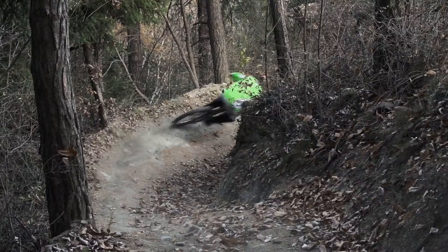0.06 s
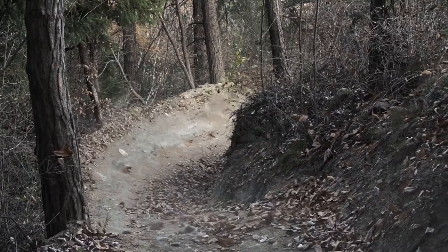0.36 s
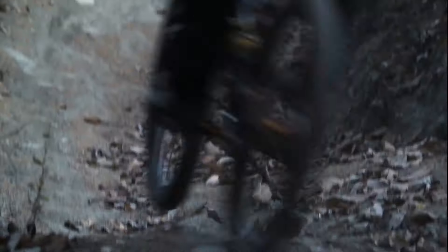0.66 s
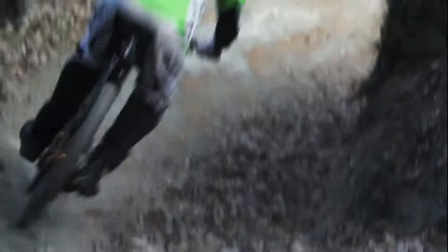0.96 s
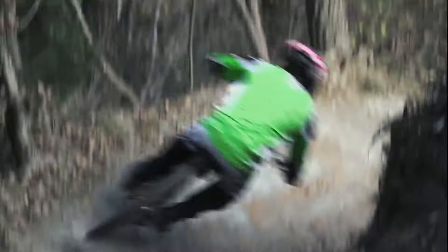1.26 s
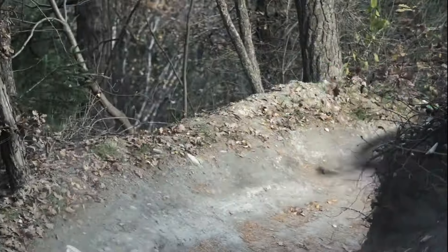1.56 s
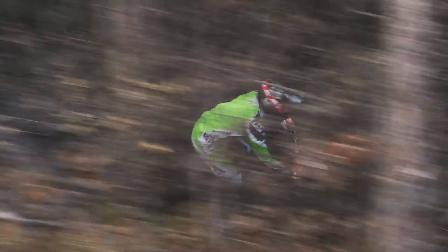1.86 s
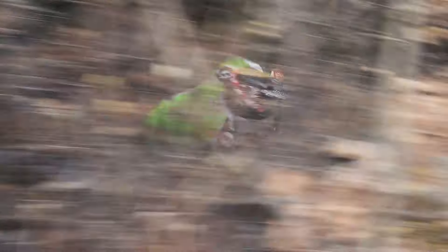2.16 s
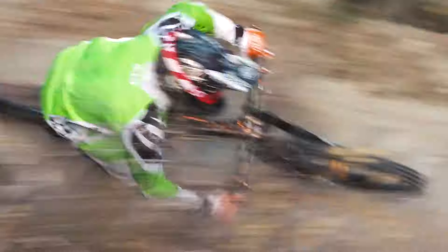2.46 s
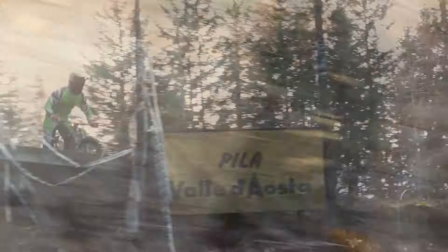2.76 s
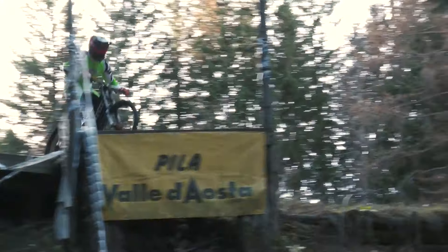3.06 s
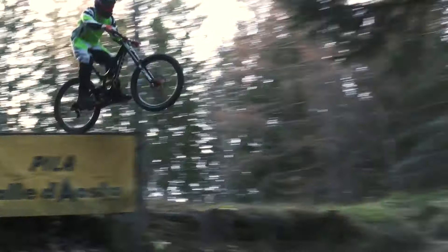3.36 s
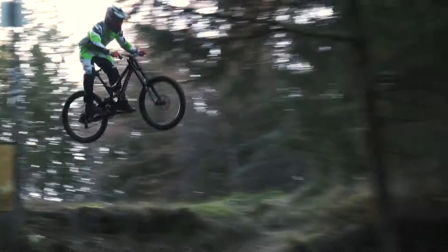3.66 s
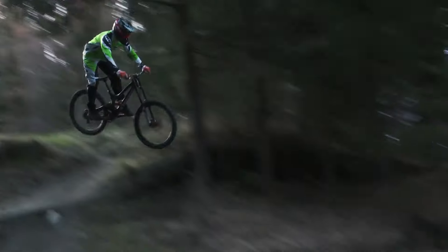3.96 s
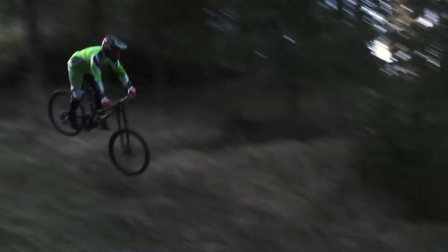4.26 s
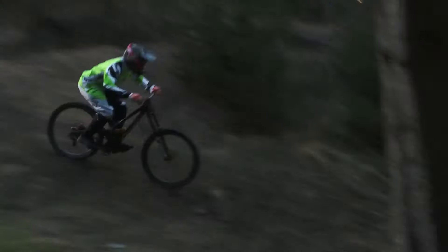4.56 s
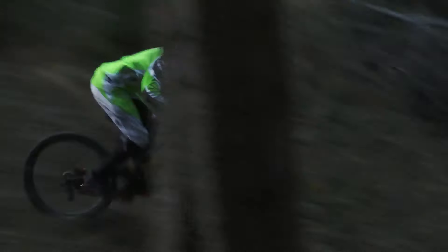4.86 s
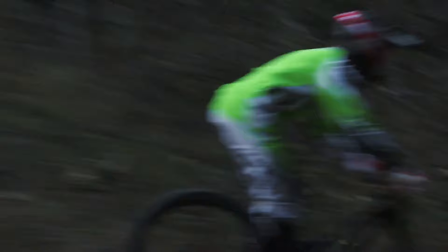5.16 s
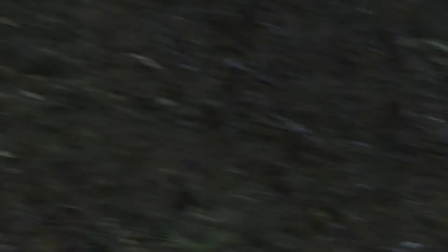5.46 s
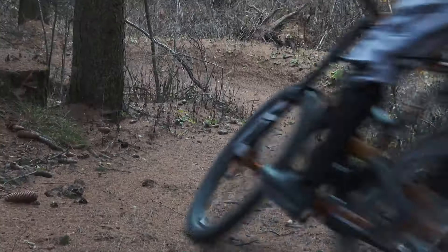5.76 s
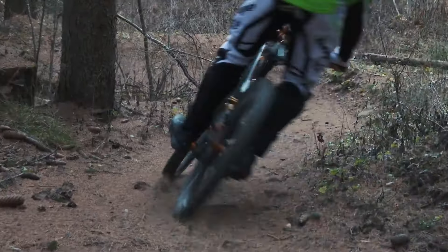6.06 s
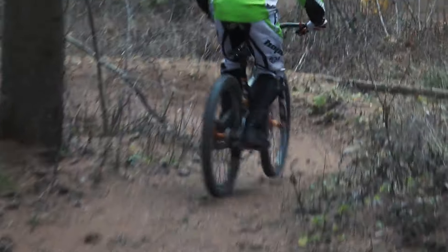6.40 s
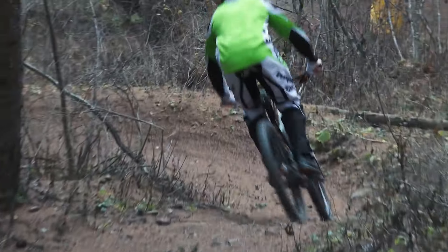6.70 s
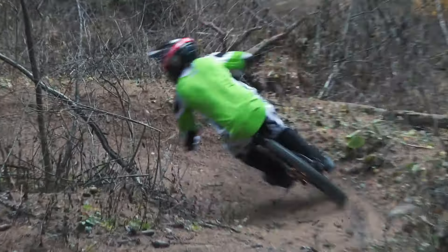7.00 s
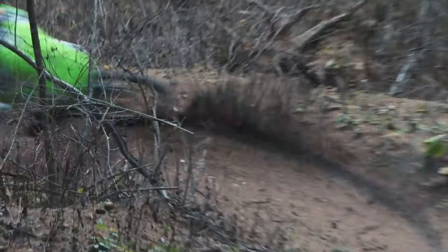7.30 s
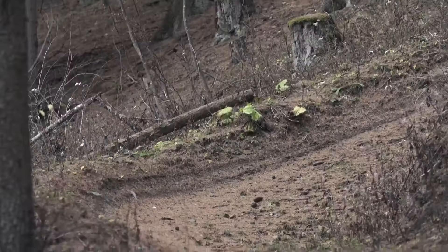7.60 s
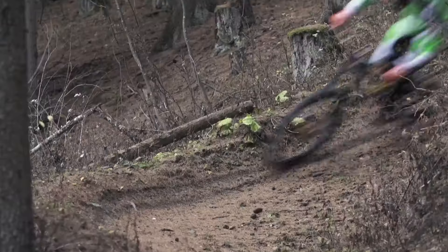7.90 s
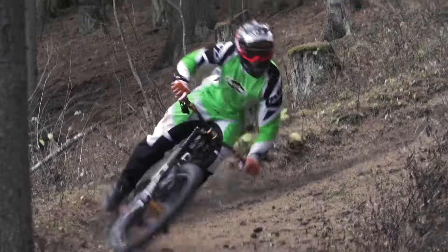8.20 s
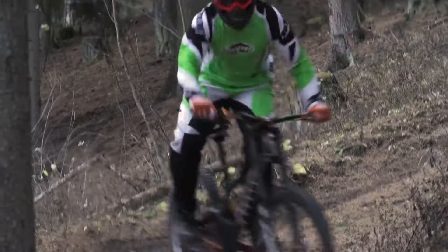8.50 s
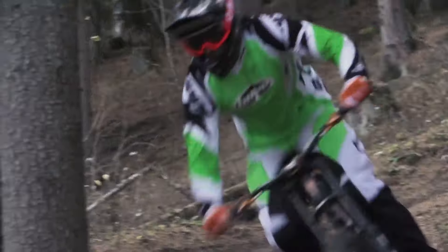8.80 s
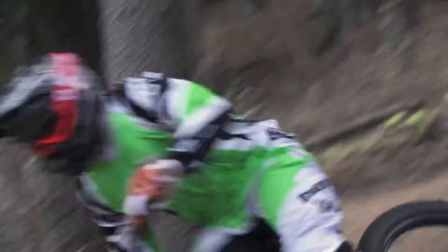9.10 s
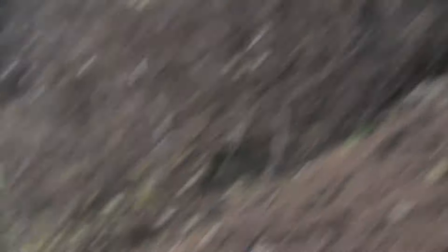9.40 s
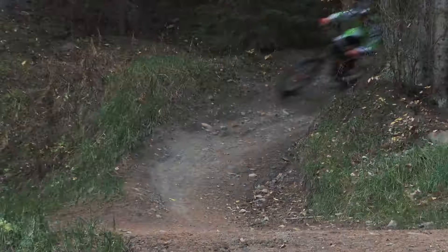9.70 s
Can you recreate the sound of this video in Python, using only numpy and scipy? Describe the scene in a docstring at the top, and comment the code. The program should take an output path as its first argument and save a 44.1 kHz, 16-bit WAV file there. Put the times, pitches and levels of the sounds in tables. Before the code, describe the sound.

Mountain bikes race down a forest dirt trail, tyres scrubbing through dirt and dry leaves, frames rattling and freehubs buzzing.

```python
"""Mountain bikes race down a forest dirt trail. From the start, knobbly tyres roar and scrub through
berms and throw dirt into dry leaves, while bumps set frame and chain clattering. Thin, very high chirps
sound among the trees; gravel skids and gusts of air rumble. About three seconds in, a bike takes a jump:
the pawls of its freehub tick ever more slowly in the air, and it lands with a hollow boom. Riders then
pass close, their freehubs buzzing whenever they coast, over the faint hush of the forest."""
import sys
import numpy as np
from scipy import signal
from scipy.fft import rfft, irfft, next_fast_len
from scipy.io import wavfile
from scipy.ndimage import uniform_filter1d, map_coordinates

SR = 44100
rng = np.random.default_rng(int(sys.argv[2]) if len(sys.argv) > 2 else 0)


def write(x):
    x = np.atleast_2d(x).T
    wavfile.write(sys.argv[1], SR, np.round(np.clip(x, -1, 1) * 32767).astype(np.int16))


N = 434385


def amp(db):
    """Decibels to amplitude ratio."""
    return 10 ** (np.asarray(db) / 20)


def unit(x):
    """Normalisation to rms 1."""
    return x / np.sqrt(np.mean(x ** 2) + 1e-20)


def along(points, hz):
    """Interpolation of (Hz, value) points on a logarithmic frequency axis."""
    f, values = np.transpose(points)
    return np.interp(np.log(hz + 1), np.log(f + 1), values)


def curves(rows):
    """Linear interpolation in time: one value per sample for each column after the first."""
    times, *columns = np.transpose(rows)
    return [np.interp(np.arange(N) / SR, times, column) for column in columns]


def wobble(rate):
    """Random modulation: straight lines through rate Gaussian knots a second."""
    knots = rng.standard_normal(4096)
    return np.interp(np.arange(N) * rate / SR, np.arange(len(knots)), knots)


def swell(s, rise, hold, fall):
    """Exponential envelope: up 20 dB per rise seconds until s, held, then down 20 dB per fall seconds."""
    t = np.arange(N) / SR - s
    return amp(-20 * np.minimum(np.maximum(-t, 0) / rise + np.maximum(t - hold, 0) / fall, 10))


def filtered(x, response):
    """Linear filtering: the spectrum of x times a complex frequency response."""
    n = x.shape[-1]
    size = next_fast_len(n + 4096)
    return irfft(rfft(x, size) * response(np.fft.rfftfreq(size, 1 / SR)), size)[..., :n]


def low_passed(x, cutoff_hz, order=4):
    """Zero-phase attenuation above a cutoff."""
    return filtered(x, lambda hz: 1 / (1 + (hz / cutoff_hz) ** order))


def coloured(x, spectrum):
    """Spectral shaping by (Hz, dB) points, at rms 1."""
    return unit(filtered(x, lambda hz: amp(along(spectrum, hz))))


def ring(x, modes, scale=1):
    """Modal resonance: x drives (centre, bandwidth, dB) modes, shifted and widened by scale."""
    def response(f):
        total = 0
        for k, (centre, width, db) in enumerate(modes):
            damping = 1j * f * width * scale
            total += (-1) ** k * amp(db) * damping / ((centre * scale) ** 2 - f * f + damping)
        return total
    return filtered(x, response)


def add(track, s, sound):
    """Superposition of a sound on a track at s seconds."""
    start = int(np.clip(round(s * SR), 0, N - 1))
    track[start:start + len(sound)] += sound[:N - start]


def crunch(rate, spread_db, share):
    """Shot noise: rate impacts a second carry a share of the power, countless small ones the rest."""
    struck = rng.random(N) < rate / SR
    sizes = amp(spread_db * np.clip(rng.standard_normal(N), -2, 2))
    grains = unit(struck * sizes * rng.choice([-1, 1], N))
    return np.sqrt(share) * grains + np.sqrt(1 - share) * rng.standard_normal(N)


def trail_levels(blend_s=0.07):
    """Incoherent sounds add in power: the running levels in dB of roar, scrub, grit, leaves and wind."""
    # Steady stretches of trail. Each row: start in seconds, then roar, scrub, grit, leaves, wind in dB.
    stretches = [(0, -48, -55, -41.5, -47, -70), (0.47, -44.5, -44.5, -43.5, -43.5, -78),
                 (1.8, -46.5, -53.5, -46.5, -49, -40.5), (2.93, -57, -64.5, -70, -67, -47),
                 (3.42, -68, -63.5, -63, -70, -57.5), (4.39, -63, -72, -54, -44, -49.5),
                 (5.4, -50.5, -56.5, -58, -47.5, -43), (7.48, -60, -56, -55.5, -52, -45),
                 (8.4, -52, -53, -50.5, -49.5, -42)]
    # Tyres bite into berms, ramps and landings.
    # Each row: peak time, rise and fall in seconds, then roar, scrub and grit in dB.
    carves = [(0.02, 0.23, 0.51, -42.5, -34, -35.5), (0.45, 0.22, 0.51, -37, -38, -42),
              (0.74, 0.21, 0.16, -33, -32, -34.5), (1.19, 0.34, 0.49, -41, -34, -40),
              (1.46, 0.31, 0.59, -35, -33.5, -34.5), (2.0, 0.13, 1, -51, -54, -41.5),
              (2.62, 1, 0.3, -54, -55, -44.5), (3.17, 0.11, 0.37, -41, -52, -52.5),
              (3.3, 0.23, 0.21, -46.5, -52, -49.5), (4.45, 0.082, 0.42, -36.5, -42, -37),
              (5.248, 0.21, 0.21, -25.5, -24.5, -30), (5.63, 0.37, 0.29, -33, -34, -32.5),
              (5.98, 0.36, 0.49, -38.5, -42.5, -41), (7.09, 0.24, .25, -40, -44, -53),
              (7.265, 0.32, 0.17, -34, -40, -43), (7.35, 0.2, 0.12, -35, -48, -46),
              (8.15, 0.4, 0.27, -41, -39.5, -44.5), (8.275, 0.4, 0.22, -37, -33.5, -39.5),
              (9.02, 0.22, 0.28, -38, -35.5, -33.5), (9.278, 0.12, .14, -32, -33, -32),
              (9.5, 0.25, 0.33, -35, -37, -37.5)]
    # Dirt thrown into leaves. Each row: start, hold and fall in seconds, level in dB.
    sprays = [(0.482, 0.43, 0.6, -36.5), (1.498, 0.26, 0.13, -39.5), (2.438, 0.29, 0.29, -44),
              (4.401, 0.22, 0.065, -41), (5.182, 0.6, 0.16, -45.5), (5.959, 0.11, 1, -38),
              (7.3, 0.16, .5, -58), (8.076, 0.087, 0.47, -46.5), (9.27, 0.054, 0.2, -31),
              (9.677, .06, 0.11, -45)]
    # Gusts of air. Each row: peak time in seconds, level in dB.
    gusts = [(1.819, -43), (1.899, -36), (2.08, -34.5), (2.25, -37), (2.48, -35), (2.8, -41), (4.44, -33.5),
             (5.28, -32.5), (5.55, -35), (5.87, -31), (7.24, -38), (7.66, -35.5), (7.76, -30), (8.05, -39),
             (8.35, -36), (9.0, -40), (9.28, -32)]
    starts, *levels_db = np.transpose(stretches)
    stretch = np.searchsorted(starts[1:], np.arange(N) / SR)
    steady_db = uniform_filter1d(np.array(levels_db)[:, stretch], int(blend_s * SR), axis=1)
    power = amp(steady_db) ** 2
    for s, rise, fall, *tyre_db in carves:
        power[:3] += amp(tyre_db)[:, None] ** 2 * swell(s, rise, 0, fall) ** 2
    for s, hold, fall, db in sprays:
        power[3] += (amp(db) * swell(s, rise=0.04, hold=hold, fall=fall)) ** 2
    for s, db in gusts:
        power[4] += (amp(db) * swell(s, rise=0.06, hold=0, fall=0.3)) ** 2
    return 10 * np.log10(power)


def tyres(roar_db, scrub_db, grit_db):
    """Rolling noise: knobs drum on the casing and tear at the soil, modulated by the fluttering load."""
    # Spectra of casing, soil and grit. Each row: frequency in Hz, relative density in dB.
    roar_spectrum = [(50, -24), (100, -3.5), (160, -1), (260, 2.5), (400, -8.5), (520, -21), (900, -65)]
    scrub_spectrum = [(250, -26.5), (400, 0.5), (500, 1), (680, -0.5), (950, -6.5), (1200, -22),
                      (2200, -57)]
    grit_spectrum = [(600, -14), (1000, 1.5), (1300, 3.5), (2000, 1.5), (2900, -2), (4200, -7.5),
                     (6500, -16.5), (12000, -36)]
    load = wobble(45)
    roar = amp(roar_db + 1.3 * load) * coloured(crunch(500, spread_db=4, share=0.8), roar_spectrum)
    scrub = amp(scrub_db + 0.49 * load) * coloured(crunch(600, spread_db=4.5, share=0.54), scrub_spectrum)
    grit_gain = amp(grit_db + 0.53 * load + 1.76 * wobble(130))
    grit = grit_gain * coloured(crunch(900, spread_db=4.5, share=0.45), grit_spectrum)
    return roar + scrub + grit


def spray(level_db):
    """Granular impact noise: thrown dirt patters on dry leaves in small clumps."""
    # Spectrum of struck leaves. Each row: frequency in Hz, relative density in dB.
    leaves = [(1500, -4.5), (3000, 5), (4500, 3), (6300, 3), (9000, 1), (12000, -1), (15800, -5)]
    return amp(level_db + 2.4 * wobble(110)) * coloured(crunch(1200, spread_db=5, share=0.39), leaves)


def stones(grit_db, count=260, lowest_hz=1100, octaves=0.97, t60_s=0.0099):
    """Heavily damped resonance: stones crack together under the tyres, each a brief, rough knock."""
    track = np.zeros(N)
    t = np.arange(SR // 60) / SR
    for when, pitch, size in rng.random((count, 3)):
        at = int(when * N)
        hz = lowest_hz * 2 ** (octaves * pitch)
        contact = rng.standard_normal(len(t)) * amp(-60 * t / t60_s)
        knock = ring(contact, [(hz, hz / 2, 0)])
        add(track, at / SR, amp(grit_db[at] + 14.5) * size ** 2 * knock / np.abs(knock).max())
    return track


def bump(length_s, thud_db, knock_db, clack_db, clank_hz, clank_db, contacts_per_s=1900):
    """Impact excitation: a cluster of contacts rings the modes of tyre, frame, chain and a metal part."""
    # Modes of the bike. Each row: nominal frequency and bandwidth in Hz, relative level in dB.
    casing = [(154, 41, -4.5), (257.6, 52, 3), (366, 110, 0.5)]
    frame = [(467, 103, 1.1), (745, 170, 1.5), (994, 240, -3), (1400, 290, -5.5)]
    chain = [(1720, 430, 1.5), (2400, 300, 4.5), (2840, 260, 3.5), (3560, 320, 1.5), (4340, 620, -5.5),
             (6000, 1400, -10.5)]
    # Modes of the metal part. Each row: frequency and bandwidth as multiples of its pitch, level in dB.
    clank = [(1, 0.082, 1), (1.26, .09, -6.5), (1.63, 0.12, -10.5)]
    t = np.arange(SR // 9) / SR
    # The shaking builds as the wheel meets the bump, eases across it, then dies away.
    rise = 1 - np.exp(-t / (0.2 * length_s))
    t60_s = 0.0085 + 4.4 * length_s
    fall = amp(-7 * np.minimum(t / length_s, 1) - 60 * np.maximum(t - length_s, 0) / t60_s)
    contacts = (rng.random(len(t)) < contacts_per_s / SR) + 0.13
    detune = np.exp(0.05 * rng.standard_normal(3))
    heaviness = length_s / 0.0083  # longer, heavier blows ring casing and chain lower
    parts = [(casing, thud_db, detune[0] * heaviness ** -0.088),
             (frame, knock_db, detune[1]),
             (chain, clack_db, detune[2] * heaviness ** -0.065),
             (clank, clank_db, clank_hz)]
    sound = np.zeros(len(t))
    for modes, db, scale in parts:
        part = ring(rise * fall * contacts * rng.standard_normal(len(t)), modes, scale)
        sound += amp(db) * part * np.sqrt(length_s * SR / np.sum(part ** 2))
    return sound


def hard_bumps():
    """Shock excitation: roots and rocks shake the whole bike."""
    # Each row: start and length in seconds, tyre thud, frame knock and chain clack in dB,
    # pitch of the struck metal part in Hz, its level in dB.
    blows = [(0.025, 0.0065, -28.5, -28, -28, 2620, -35), (0.098, 0.028, -32, -36, -27.5, 2000, -34.5),
             (0.156, 0.013, -35, -33.5, -31.5, 2490, -34), (0.199, 0.0084, -40, -36, -33, 2330, -26.5),
             (0.207, .009, -32, -35, -29, 1720, -23), (0.229, 0.0071, -30, -30, -34, 1310, -25),
             (0.236, 0.015, -29.5, -24.5, -25.5, 1770, -27), (0.254, 0.009, -29, -31, -39, 1400, -33),
             (0.312, 0.0067, -36, -31.5, -33, 1490, -26), (0.39, .004, -35, -44, -42, 1500, -37),
             (0.411, .005, -46, -39, -42, 1360, -32), (0.616, 0.0058, -28, -15.5, -24.5, 1450, -23.5),
             (0.635, 0.005, -23.5, -26, -42, 980, -41), (0.69, 0.0095, -38, -31, -39, 1900, -36),
             (0.775, 0.0081, -44, -34, -36, 1360, -31.5), (0.798, 0.0031, -21, -21.5, -37, 1010, -33),
             (0.861, 0.002, -26, -19.5, -30, 1850, -29), (1.114, 0.029, -31.5, -23, -27.5, 1040, -27),
             (1.324, 0.0056, -34, -23, -49, 1230, -40), (1.421, 0.009, -23.5, -21, -29, 1668, -31),
             (1.483, .01, -36, -33, -33, 3000, -29), (1.567, 0.014, -31, -31, -32, 2100, -34.5),
             (1.647, 0.019, -31.5, -39, -35.5, 1900, -34), (1.684, 0.0036, -39, -41.5, -28.5, 2820, -31),
             (1.937, 0.033, -46, -40.5, -36, 1710, -36), (2.061, 0.01, -50, -44, -52, 1600, -44),
             (2.228, .006, -39, -42, -43, 1600, -43), (2.344, 0.0087, -48, -45, -45, 1950, -34.5),
             (2.521, 0.0058, -54, -48, -44, 1800, -36), (2.583, 0.0074, -56, -38.5, -38, 1650, -40),
             (3.139, 0.011, -48, -44, -50, 2100, -52), (3.321, 0.007, -52, -47, -55, 760, -42),
             (3.35, 0.012, -54, -48, -51, 755, -46), (4.398, 0.011, -39, -41, -32.5, 2400, -35),
             (4.433, 0.0037, -38, -46, -31, 3000, -36), (4.448, 0.021, -31.5, -38, -38, 1340, -34),
             (4.991, .009, -27, -37, -40, 1400, -48), (5.112, 0.0085, -34, -39, -34.5, 3000, -32),
             (5.138, 0.0043, -22.5, -25, -42, 1390, -46), (5.178, 0.019, -27, -24, -37, 1400, -40),
             (5.213, 0.0012, -40, -34, -28, 5600, -27.5), (5.229, 0.0094, -24, -22, -30, 1420, -31),
             (5.303, 0.023, -20, -22.5, -32, 1100, -32.5), (5.313, 0.0018, -32, -29, -33, 6900, -25.5),
             (5.401, 0.0052, -27.5, -28, -36, 1100, -34), (5.553, 0.0036, -25.5, -28, -39, 3960, -36),
             (5.71, 0.02, -38, -25.5, -29.5, 1370, -27.5), (5.721, 0.0029, -35, -27, -26, 4760, -20),
             (5.834, 0.0086, -28.5, -26.5, -29.5, 1184, -32), (6.312, .004, -46, -40, -44, 1697, -46),
             (6.634, 0.0053, -53, -41, -46, 1400, -45), (7.314, 0.0048, -40, -48, -39, 3420, -44),
             (7.422, 0.0043, -51, -68, -36.5, 2250, -40), (8.075, 0.0035, -41, -33.5, -44, 1894, -35.5),
             (8.174, 0.009, -42, -31, -34.5, 1000, -32), (8.552, 0.01, -51, -36.5, -43, 1090, -44),
             (8.626, 0.0072, -45, -38, -42, 1500, -41), (8.727, 0.0062, -52, -34.5, -41, 1300, -43),
             (8.813, 0.014, -33.5, -39.5, -40, 1300, -40), (8.8688, 0.0024, -36, -23, -27, 1600, -21),
             (8.872, 0.018, -31.5, -22.5, -24.5, 1250, -26.5), (8.902, 0.017, -38, -32, -31, 1510, -31),
             (8.939, 0.026, -32, -27, -29, 1200, -32.5), (9.1277, 0.0019, -46, -29, -20.5, 2050, -21),
             (9.25, 0.0022, -43, -39, -23.5, 3010, -25), (9.389, 0.016, -46, -34, -33, 1610, -33),
             (9.425, .011, -20, -25, -25, 2000, -27.5), (9.52, 0.0024, -29, -26, -19.5, 2445, -17.5),
             (9.553, 0.019, -34, -30.5, -35.5, 1490, -44), (9.633, 0.011, -28.5, -30, -34, 1830, -35),
             (9.699, 0.006, -45, -35, -27.5, 2560, -24.5), (9.718, 0.01, -41, -36, -34, 1850, -33.5),
             (9.772, 0.0033, -44, -39, -34, 2670, -31)]
    track = np.zeros(N)
    for s, *blow in blows:
        add(track, s, bump(*blow))
    return track


def rattles(roar_db, scrub_db, grit_db, count=50):
    """Random excitation: small bumps shake the bike, more strongly where the tyres work harder."""
    track = np.zeros(N)
    for k in range(count):
        at = int((k + rng.random()) * N / count)
        chance_db = rng.uniform(-1.3, 1)
        clank_hz = 1690 * 2 ** rng.uniform(-0.43, 0.5)
        rattle = bump(length_s=0.0066, thud_db=roar_db[at] - 1, knock_db=scrub_db[at] - 3,
                      clack_db=grit_db[at] - 0.5, clank_hz=clank_hz, clank_db=grit_db[at] + 2)
        add(track, at / SR, amp(chance_db) * rattle)
    return track


def hush(level_db=-54.5, width=0.94):
    """Ambient noise: a faint, steady forest hush with a little stereo width."""
    # Each row: frequency in Hz, relative density in dB.
    spectrum = [(50, -8), (100, -6), (145, 4), (260, -2.5), (440, -4), (600, -5.5), (720, -3), (950, -11.5),
                (1500, -13), (3000, -20.5), (6000, -24), (15000, -36)]
    apart = low_passed(rng.standard_normal((2, N)), 900)
    return amp(level_db) * coloured(rng.standard_normal(N) + width * apart, spectrum)


def hum(level_db=-62.5):
    """Narrow-band noise is heard as pitch: something far off hums faintly."""
    # Each row: frequency and bandwidth in Hz, relative level in dB.
    bands = [(595, 30, -0.5), (658, 18, -1)]
    return amp(level_db) * unit(ring(rng.standard_normal(N), bands))


def chirps(trill_gap_s=0.0425, trill_fade_db=1.8, note_s=0.0133):
    """Frequency modulation: short whistles dip and lift, and trunks scatter each into a fluttering tail."""
    # Single chirps and trills. Each row: start in seconds, pitch in Hz, level in dB, number of notes.
    calls = [(0.594, 11730, -16, 1), (1.826, 12100, -37, 1), (1.871, 12080, -23.5, 1),
             (1.969, 13000, -34, 1), (2.179, 13100, -36, 1), (3.728, 10860, -40.5, 1),
             (5.335, 13000, -46, 1), (5.399, 12500, -30, 1), (5.445, 11280, -22, 1),
             (5.506, 12740, -19.5, 1), (5.565, 12600, -17, 1), (5.749, 12700, -11.5, 1),
             (5.811, 10840, -11.5, 1), (7.035, 10950, -41, 1), (7.225, 10950, -44, 3),
             (7.29, 10780, -36, 1), (7.659, 11250, -42.5, 1), (7.753, 12400, -39, 1),
             (7.899, 11170, -37.5, 2), (8.06, 11400, -41, 1), (8.095, 12700, -36, 2), (8.42, 12400, -36, 1),
             (8.403, 11280, -31, 2), (8.54, 12370, -19, 1), (8.565, 13300, -12.5, 2),
             (8.657, 13360, -12, 5), (8.859, 13400, -14.5, 1), (9.34, 12340, -11.5, 1),
             (9.784, 10600, -26.5, 1)]
    track = np.zeros(N)
    t = np.arange(SR // 6) / SR
    age = np.minimum(t / note_s, 1)
    arch = np.abs(np.sin(np.pi * age)) ** 1.03
    echo_decay = (t > 0.004) * (amp(-60 * t / 0.05) + 0.16 * amp(-60 * t / 0.22))
    notes = [(s + k * trill_gap_s, hz, db - k * trill_fade_db)
             for s, hz, db, count in calls for k in range(round(count))]
    for s, hz, db in notes:
        quiver = np.sin(2 * np.pi * (rng.uniform(160, 188) * t + rng.random()))
        effort = amp((db + 13.5) / 22)  # louder whistles bend further
        pitch = hz * (1 + effort * (0.16 * (age - 0.42) ** 2 - 0.006 + 0.016 * quiver))
        phase = 2 * np.pi * np.cumsum(pitch) / SR
        whistle = arch * np.sin(phase)
        scatter = rng.standard_normal(len(t)) * echo_decay
        tail = signal.fftconvolve(np.sqrt(arch) * np.sin(phase), scatter)[:len(t)]
        tail *= np.linalg.norm(whistle) / np.linalg.norm(tail)
        # A faint distortion tone near 8 kHz sounds with the loudest, highest chirps.
        distortion = (hz > 13000) * amp(db - 8.5) * arch ** 3 * np.sin(0.602 * phase)
        wet = np.interp(db, [-36, -22], [1, 0.55])  # faint chirps come from further off, with more echo
        add(track, s, amp(db) * (whistle + distortion + wet * tail))
    return track


def skids():
    """Sliding friction: a skidding tyre drags loose gravel along."""
    # Each row: peak time, rise and fall in seconds, level in dB.
    slides = [(1.55, 0.35, 0.43, -46.5), (5.57, 0.15, 0.31, -33.5), (7.33, .3, 0.22, -46),
              (8.29, .3, 0.24, -45.5), (8.96, 0.195, 0.2, -44.5)]
    # Spectrum of scraped gravel. Each row: frequency in Hz, relative density in dB.
    gravel = [(1200, -31), (2400, -18), (3300, 0), (4300, -2.5), (5500, -12), (9000, -19)]
    gain = sum(amp(db) * swell(s, rise, 0, fall) for s, rise, fall, db in slides)
    return gain * amp(4 * wobble(120)) * coloured(crunch(1500, spread_db=8, share=0.41), gravel)


def wind(level_db):
    """Turbulence: moving air buffets the microphone with low pressure fluctuations."""
    # Each row: frequency in Hz, relative density in dB.
    spectrum = [(10, -13), (25, 3), (42, -1), (65, -4.5), (100, -9.5), (150, -18), (300, -57)]
    return amp(level_db + 3 * wobble(14)) * coloured(rng.standard_normal(N), spectrum)


def thumps():
    """Damped low modes: tyres and suspension take the bike's whole weight with a hollow boom."""
    # Drops onto ramp or ground. Each row: start and decay time in seconds, pitch in Hz, level in dB.
    drops = [(1.891, 0.018, 50, -30.5), (2.075, .02, 79.6, -35), (2.964, .03, 85, -41),
             (3.277, 0.021, 111, -36), (4.396, 0.022, 85, -32.5), (4.448, 0.036, 119, -24),
             (4.58, 0.019, 125, -36)]
    # Each row: frequency and bandwidth as multiples of the pitch, relative level in dB.
    modes = [(1, 0.29, 0), (2.05, 0.43, -1.5), (2.7, 0.55, -7.5)]
    track = np.zeros(N)
    t = np.arange(SR // 4) / SR
    for s, decay_s, hz, db in drops:
        push = (rng.standard_normal(len(t)) + 25 * (t == 0)) * np.exp(-t / decay_s)
        boom = low_passed(ring(push, modes, hz), 380, order=8)
        add(track, s, amp(db) * boom * np.sqrt(decay_s * SR / np.sum(boom ** 2)))
    return track


def freehub(coasts, modes, chatter_s, snap_db, sizzle_db):
    """Impulse train: pawls snap over the ratchet and ring the hub; a ground echo comb-filters the buzz."""
    snaps, lag = np.zeros(N), np.zeros(N)
    n = np.arange(N)
    for coast, jolt in coasts:
        rate, level_db, lag_ms = curves(coast)
        started = n / SR > coast[0][0]
        turning = started & (n / SR < coast[-1][0])
        stutter = np.maximum(1 + 0.4 * jolt * wobble(140), 0)  # rough ground jerks the wheel
        teeth_passed = np.floor(np.cumsum(rate * turning * stutter) / SR)
        at = np.flatnonzero(np.diff(teeth_passed) > 0)
        uneven_db = (1 + 1.5 * jolt) * rng.standard_normal(len(at))
        snaps[at] += amp(level_db[at] + uneven_db) * np.sqrt(SR / np.maximum(rate[at], 1))
        lag[started] = lag_ms[started] * SR / 1000
    # Each snap ends in a short chatter and a sizzle in the spokes.
    t = np.arange(SR // 40) / SR
    decay = np.exp(-(t / chatter_s) ** 2) + amp(sizzle_db - 60 * t / 0.036)
    energy = np.abs(signal.fftconvolve(snaps ** 2, decay / decay.sum())[:N])
    force = amp(snap_db) * snaps + np.sqrt(energy) * rng.standard_normal(N)
    direct = ring(force, modes)
    echo = 0.36 * map_coordinates(low_passed(direct, 7500), [n - lag])  # soft soil absorbs the treble
    return np.sqrt(np.mean(snaps ** 2)) * unit(direct + echo)


def hub_in_air(jolt=0.05):
    """Click rate follows wheel speed: the ticking slows as the rear wheel spins down during the jump."""
    # Each row: time in seconds, clicks a second, level in dB, lag of the ground echo in ms.
    spin_down = [(3.22, 215, -68, .31), (3.31, 172, -56, 0.29), (3.48, 163, -51.5, 0.68),
                 (3.58, 150, -51.5, .63), (3.75, 75, -54.5, 0.72), (3.93, 36, -58, .92),
                 (4.0, 13, -72, .95), (4.3, 8, -66, 1.1)]
    # Hub modes in the air. Each row: frequency and bandwidth in Hz, relative level in dB.
    modes = [(1800, 290, -2.5), (2650, 600, -3), (3280, 420, -1.5), (4300, 400, -3), (4880, 540, -2.5),
             (6400, 390, 1.5), (8800, 700, -8), (9900, 1100, -9.5), (12500, 4500, -16)]
    return freehub([(spin_down, jolt)], modes, chatter_s=0.0016, snap_db=-6, sizzle_db=-14)


def rubs():
    """Stick-slip oscillation: a brake or tyre sings a short, gliding tone with a rough edge."""
    # Each row: start and length in seconds, first and last pitch in Hz, level in dB, relative jitter.
    squeaks = [(3.256, .018, 3300, 2750, -53, .08), (3.264, .016, 2700, 3200, -51, .07),
               (3.295, 0.068, 6400, 5950, -57, .04), (8.07, .045, 6300, 6500, -39.5, .025),
               (9.224, .028, 3440, 3000, -39, .025), (9.633, 0.17, 790, 715, -45.5, .005)]
    track = np.zeros(N)
    for s, length_s, first_hz, last_hz, db, jitter in squeaks:
        age = np.linspace(0, 1, int(length_s * SR))
        pitch = (first_hz + (last_hz - first_hz) * age) * (1 + jitter * wobble(900)[:len(age)])
        gain = np.sqrt(np.abs(np.sin(np.pi * age))) * amp(2.5 * wobble(120)[:len(age)])
        add(track, s, amp(db) * unit(gain * np.sin(2 * np.pi * np.cumsum(pitch) / SR)))
    return track


def hub_on_trail(first_lag_ms=1.3, last_lag_ms=0.804, berm_jolt=0.05):
    """Rapid clicks fuse into a buzz: riders coast over rough ground close by and through a packed berm."""
    # Short coasts. Each row: start and end in seconds, first and last rate in clicks a second,
    # first and last level in dB, jolting from 0 to 1.
    short_coasts = [(5.402, 5.608, 110, 125, -51, -33, 0.6), (5.6, 5.653, 120, 120, -30.5, -27.5, 0.24),
                    (5.655, 5.692, 58, 54, -29.5, -31.5, .2), (5.735, 5.789, 115, 102, -27, -32, 0.38),
                    (5.83, 5.886, 140, 140, -39.5, -28, 0.36), (7.922, 8.094, 260, 290, -61, -38.5, 0.02),
                    (8.102, 8.58, 260, 120, -45, -44, .15), (9.08, 9.193, 119, 115, -34.5, -39.5, 0.6),
                    (9.247, 9.352, 180, 210, -34, -40, .4), (9.43, 9.569, 153, 144, -30, -38, 0.73),
                    (9.616, 9.824, 120, 130, -38.5, -46.5, 0.38)]
    # A rider coasts away and speeds up through the berm.
    # Each row: time in seconds, clicks a second, level in dB, lag of the ground echo in ms.
    berm_coast = [(5.9, 130, -33.5, 0.96), (6.05, 144, -39.5, 0.64), (6.22, 178, -41.5, 0.55),
                  (6.33, 143, -42, 0.35), (6.47, 125, -39, 0.23), (6.62, 150, -41, 0.23),
                  (6.73, 180, -38, .185), (6.85, 170, -51.5, 0.21), (7.03, 224, -46, 0.11),
                  (7.22, 230, -40, 0.14), (7.3, 213, -51, 0.18), (7.5, 240, -54, 0.14)]
    # Hub modes on the trail. Each row: frequency and bandwidth in Hz, relative level in dB.
    modes = [(1600, 210, -6.5), (3000, 180, 5), (4200, 690, -0.5), (5370, 630, 0), (6220, 280, 5.5),
             (8200, 1900, -1), (12900, 6900, -8.5)]
    coasts = [([(start, rate0, db0, first_lag_ms), (end, rate1, db1, last_lag_ms)], jolt)
              for start, end, rate0, rate1, db0, db1, jolt in short_coasts]
    close = freehub(coasts, modes, chatter_s=0.003, snap_db=-16, sizzle_db=-20.5)
    berm = freehub([(berm_coast, berm_jolt)], modes, chatter_s=0.0012, snap_db=-7.5, sizzle_db=-30)
    return close + berm


def forest_echo(x, level_db=-23):
    """Reverberation: the trunks return a thin echo whose decay depends on frequency."""
    # Each row: frequency in Hz, time to fall 60 dB in seconds.
    decay_times = [(150, 0.97), (1500, 0.017), (6000, 0.028), (14000, 0.13)]
    hz, t, noise = signal.stft(rng.standard_normal(SR // 2), SR, nperseg=256)
    decay = amp(-60 * t / along(decay_times, hz)[:, None])
    _, tail = signal.istft(noise * decay, SR, nperseg=256)
    return amp(level_db) * signal.fftconvolve(x, tail / np.linalg.norm(tail))[:N]


def scattered(x):
    """Early reflections: nearby ground and trunks scatter the sound within 20 milliseconds."""
    t = np.arange(SR // 50) / SR
    burst = rng.standard_normal(len(t)) * (t > 0.001) * amp(-60 * t / 0.04)
    return signal.fftconvolve(x, burst / np.linalg.norm(burst))[:N]


def scene():
    """Level differences between the ears swing the sound from side to side; scattering widens it."""
    # Direction. Each row: time in seconds, left against right in dB.
    pan = [(0, 2), (0.45, -3), (0.63, -3.8), (0.73, 0), (1.15, 2), (1.35, -1), (1.6, -6.5), (1.82, -6),
           (1.92, 0.5), (2.7, -3.5), (2.9, -3.5), (3.0, 4.5), (4.55, 4), (5.5, -4.5), (5.8, -3), (5.95, 0),
           (7.13, 0.5), (7.38, 4), (7.52, 5), (7.6, -1.5), (7.81, -3), (8.05, 0), (8.3, 2.5), (8.5, -0.5),
           (8.98, -1.5), (9.55, 3.5), (9.85, 3)]
    # Spread between the ears. Each row: time in seconds, side against middle in dB.
    width = [(0, -50), (1.8, -37), (1.9, -56), (2.9, -29), (3.0, -34), (5.8, -34), (5.95, -55), (7.2, -41),
             (7.5, -30), (9.85, -23)]
    pan_db, = curves(pan)
    width_db, = curves(width)
    roar_db, scrub_db, grit_db, leaves_db, wind_db = trail_levels()
    ground = tyres(roar_db, scrub_db, grit_db) + spray(leaves_db) + stones(grit_db) + skids()
    hubs = hub_in_air() + hub_on_trail()
    clatter = rattles(roar_db, scrub_db, grit_db) + hard_bumps()
    direct = ground + hubs + clatter + thumps() + rubs() + chirps()
    middle = direct + forest_echo(direct) + wind(wind_db)
    side = amp(width_db) * (scattered(direct) + wind(wind_db))
    stereo = np.array([middle + side, middle - side]) + hush() + hum()
    gains = amp(np.array([pan_db, -pan_db]) / 2)
    return stereo * gains / gains.mean(axis=0)


def record(dry):
    """Band limiting: nothing above 15.9 kHz passes."""
    return filtered(dry, lambda hz: hz < 15900)


dry = scene()
out = record(dry)
write(out)
```